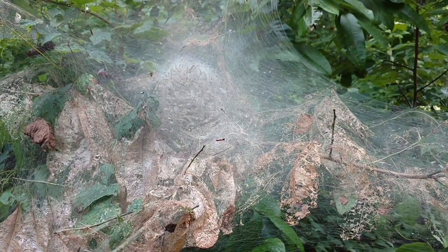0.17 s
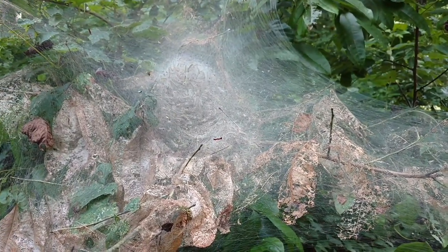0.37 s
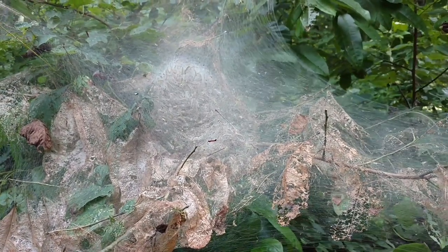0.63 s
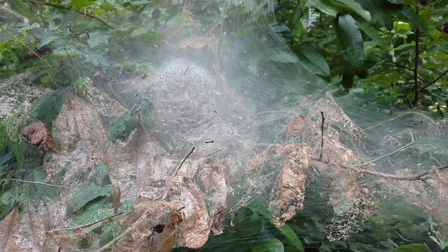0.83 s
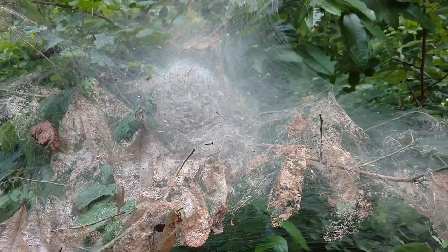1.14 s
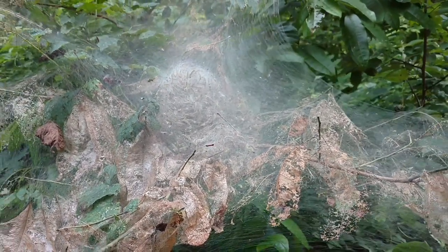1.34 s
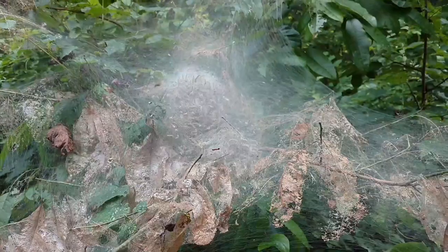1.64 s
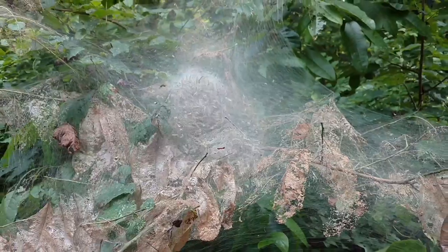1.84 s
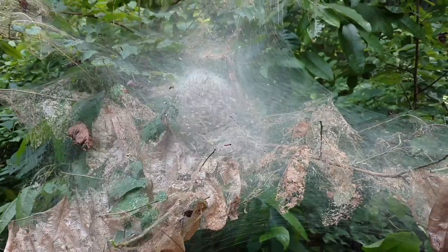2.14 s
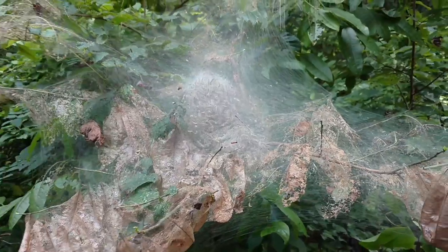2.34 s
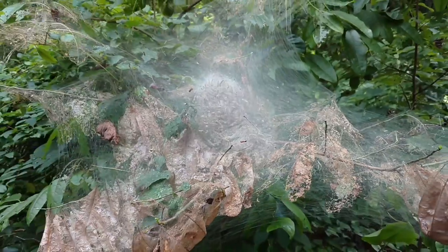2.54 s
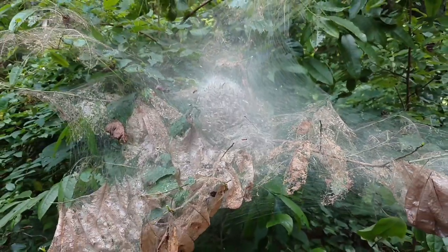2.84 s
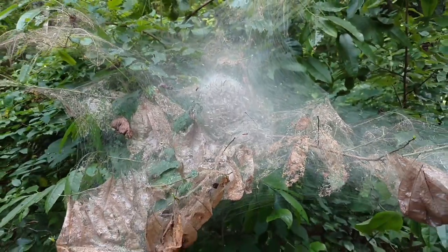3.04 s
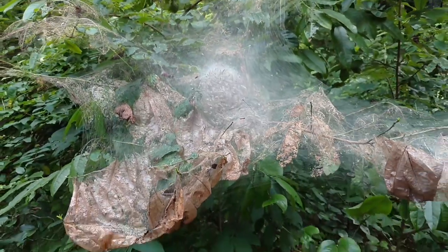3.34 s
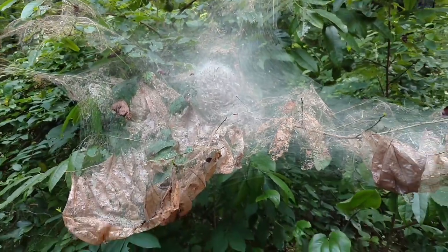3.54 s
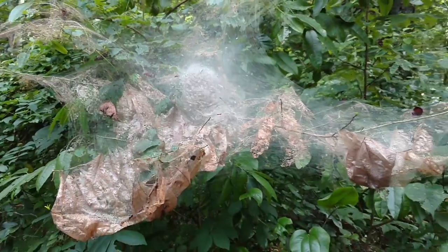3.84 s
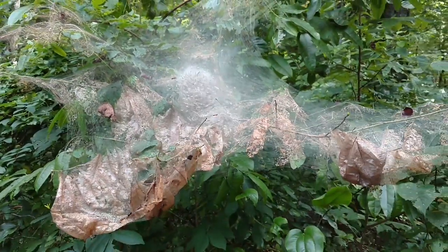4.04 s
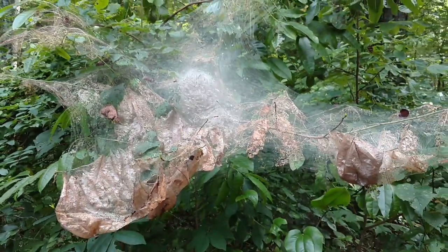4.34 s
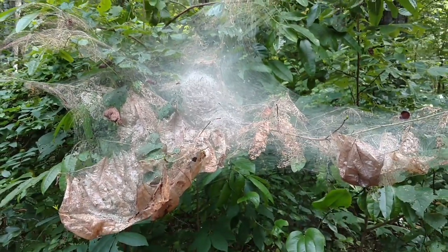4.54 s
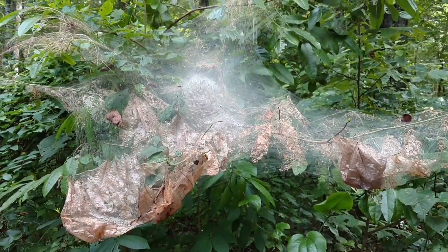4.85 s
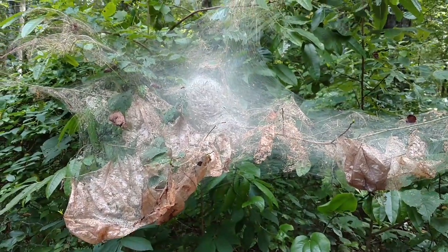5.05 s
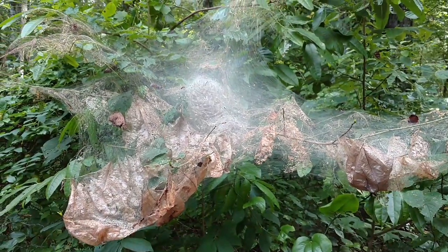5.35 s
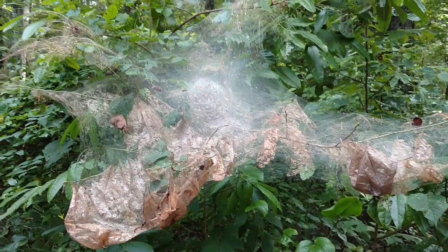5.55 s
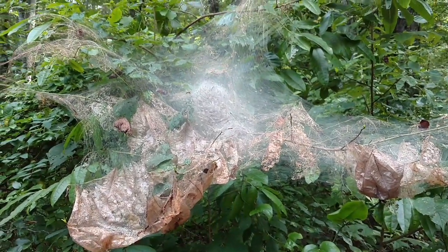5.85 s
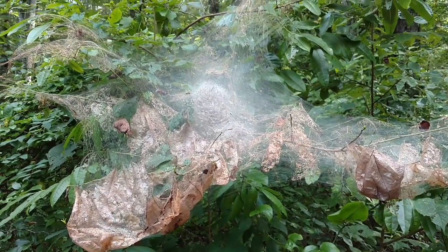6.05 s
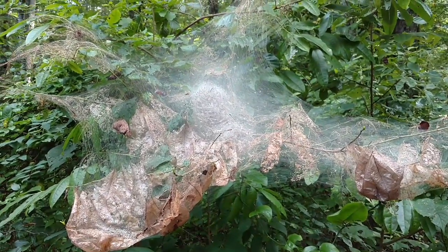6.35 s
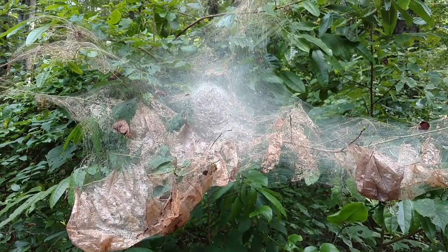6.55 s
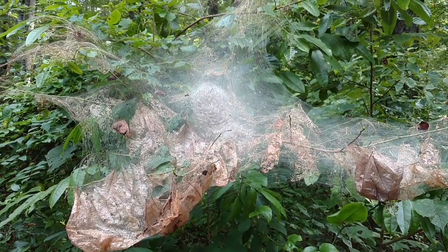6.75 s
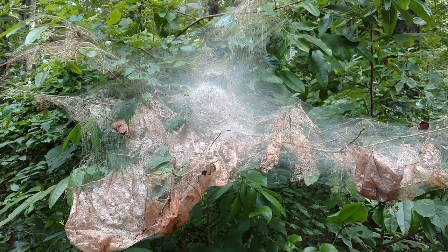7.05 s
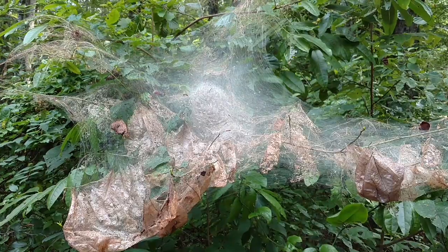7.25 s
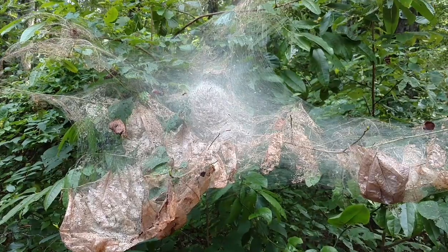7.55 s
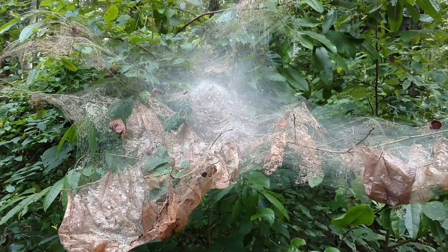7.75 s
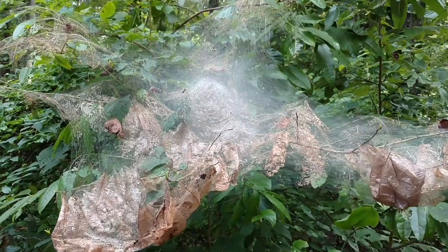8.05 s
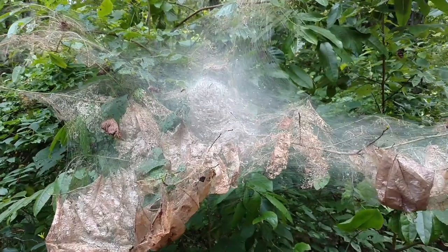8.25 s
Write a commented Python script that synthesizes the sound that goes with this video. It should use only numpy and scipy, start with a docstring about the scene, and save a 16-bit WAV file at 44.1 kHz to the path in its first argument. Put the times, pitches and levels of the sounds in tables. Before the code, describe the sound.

Shrill crickets fill the woodland air with a quick, quivering trill, short run-together chirps and a blurred far chorus. Beneath them a tangled wasp buzzes in ragged, fuzzy surges, weakening and recovering. Sparse dry snaps of twigs and leaves, the sharpest about two seconds in, break through gentle air hiss. The wide outdoor stereo is close and hand-held, with low tremor and two small grip knocks.

```python
"""A wasp caught in a web buzzes raggedly: five bands of noise at its wingbeat multiples, each driven by the struggle.
Summer crickets surround it: a near one strokes 21 tones a second, another trills short chirps, a far one sings
phrases of blurred tone, the rest are a chorus of resonated noise. Air and leaves hiss; twigs and dry leaves tick.
Two close hand-held capsules rumble and bump; the recorder widens them by delayed cross-subtraction."""
import sys
import numpy as np
from scipy import signal
from scipy.fft import rfft, irfft, next_fast_len
from scipy.io import wavfile

SR = 44100
rng = np.random.default_rng(int(sys.argv[2]) if len(sys.argv) > 2 else 0)


def store_pcm(level_fs):
    """Save levels as 16-bit WAV."""
    pcm = np.round(np.clip(level_fs, -1, 1) * 32767).astype(np.int16)
    wavfile.write(sys.argv[1], SR, np.atleast_2d(pcm).T)


N = 370440


def amp(db):
    """Decibels to gain."""
    return 10 ** (np.asarray(db) / 20)


def rms_one(x):
    """Scale to unit rms."""
    return x / np.sqrt(np.mean(x ** 2) + 1e-20)


def in_time(rows):
    """Interpolate each column after the first, sample by sample."""
    s, *columns = np.transpose(rows)
    return [np.interp(np.arange(N) / SR, s, column) for column in columns]


def at_hz(points, hz):
    """Read a spectrum on a log frequency axis."""
    points_hz, values = np.transpose(points)
    return np.interp(np.log(hz), np.log(points_hz), values)


def drift(rate_hz):
    """Slow random curve of unit rms: noise through two equal poles, computed every 40 samples."""
    step = 40
    r = np.exp(-2 * np.pi * rate_hz * step / SR)
    noise = rng.standard_normal(N // step + 2002)
    slow = signal.lfilter([1], [1, -2 * r, r * r], noise)[2000:]   # settled part
    return np.interp(np.arange(N) / step, np.arange(len(slow)), rms_one(slow))


def band_pass(x, low_hz, high_hz):
    """Second-order Butterworth band."""
    return signal.sosfilt(signal.butter(2, [low_hz, high_hz], "band", fs=SR, output="sos"), x)


def smear(noise, hz, width_hz):
    """A flat-topped band of noise around a pitch."""
    return band_pass(noise, hz - width_hz / 2, hz + width_hz / 2)


def resonate(x, hz, width_hz):
    """One two-pole resonance, gain about 1 at its top."""
    r = np.exp(-np.pi * width_hz / SR)
    zeros = np.array([1, 0, -1]) * (1 - r * r) / 2
    return signal.lfilter(zeros, [1, -2 * r * np.cos(2 * np.pi * hz / SR), r * r], x)


def pair(noise, alike):
    """Mix two unrelated noises into left and right of a given likeness."""
    alike = np.clip(alike, 0, 1)
    common = np.sqrt(1 + alike) * noise[0]
    opposed = np.sqrt(1 - alike) * noise[1] * np.array([[1], [-1]])
    return (common + opposed) / np.sqrt(2)


def pan_gain(pan_db):
    """Left and right gains for a level difference."""
    return amp([[pan_db / 2], [-pan_db / 2]])


def add(out, s, sound):
    """Mix a short sound in at a time."""
    i = max(round(s * SR), 0)
    out[..., i:i + sound.shape[-1]] += sound[..., :max(N - i, 0)]


def wing_note(length_s, hz, sag_hz, fall_hz, phase):
    """A file drawn over a scraper: complex tone under an arch, flatter at both ends and falling as it goes."""
    place = np.linspace(-1, 1, round(length_s * SR))
    pitch_hz = hz - fall_hz * place - sag_hz * place ** 2
    return (1 - place ** 2) ** 0.75 * np.exp(1j * (phase + 2 * np.pi * np.cumsum(pitch_hz) / SR))


def arrive(tone, hz, lead_us, pan_db, echo_db):
    """A narrow tone at both capsules (a left lead turns its phase), with short scatter from the leaves."""
    turn = np.exp(1j * np.pi * hz * lead_us * 1e-6)   # half the lead on each side
    direct = np.real([tone * turn * amp(pan_db / 2), tone / turn / amp(pan_db / 2)])
    age_s = np.arange(round(.08 * SR)) / SR
    leaves = rng.standard_normal((2, len(age_s))) * amp(-60 * age_s / 0.3) * (age_s > .002)
    leaves = leaves / np.linalg.norm(leaves[0])
    scatter = signal.oaconvolve(tone.real[None], leaves, axes=1)[:, :N]
    return direct + amp(echo_db) * scatter


# Wasp's struggle. Each row: time in seconds, wingbeat effort in dB, overtone effort in dB.
STRUGGLE = [(0.0, -52, -55), (0.65, -50, -52.5), (1.05, -49.5, -53.5), (1.33, -48.5, -54),
            (1.55, -53.5, -53), (1.87, -46, -52.5), (2.1, -47.5, -50), (2.57, -46.5, -57.5),
            (2.74, -43.5, -47), (2.95, -41.5, -42), (3.32, -47, -48), (3.55, -49.5, -51),
            (3.72, -43, -46.5), (3.9, -46, -46.5), (4.14, -45.5, -51.5), (4.6, -45, -51.5),
            (4.84, -46, -48), (5.25, -43.5, -49), (5.85, -45.5, -51), (6.1, -43.5, -49), (6.4, -43, -52),
            (6.62, -45, -52.5), (6.92, -46.5, -54.5), (7.13, -51.5, -58), (7.75, -52.5, -57),
            (8.09, -52, -53.5), (8.4, -46, -53)]
# Wingbeat multiples. Each row: center in Hz, smear width in Hz, level in dB added to its effort.
WINGBEAT_BANDS = [(128.1, 66.8, 7.5), (238.8, 82.3, 4), (364, 88, 2.5), (483, 88, -10), (588, 113, -20)]
SECOND_WAVER_DB, HIGHER_WAVER_DB = 0.43, 1.5   # rms
HIGHER_DB = -8.5   # multiples above the second
STRAIN_SHARE, CALM_DB = 0.65, -47   # above this overtone effort the top two grow faster


def wasp():
    """Tangled wings keep losing their rhythm, so each wingbeat multiple smears into a band of noise."""
    first_db, over_db = in_time(STRUGGLE)
    second_db = over_db + SECOND_WAVER_DB * drift(2.6)
    higher_db = over_db + HIGHER_DB + HIGHER_WAVER_DB * drift(3.8)
    top_db = higher_db + STRAIN_SHARE * np.maximum(over_db - CALM_DB, 0)
    efforts_db = [first_db, second_db, higher_db, top_db, top_db]
    push = rng.standard_normal((2, N))
    buzz = np.zeros((2, N))
    for effort_db, (hz, width_hz, db) in zip(efforts_db, WINGBEAT_BANDS):
        band = smear(smear(push, hz, width_hz), hz, width_hz)   # twice for steep sides
        buzz += amp(effort_db + db) * rms_one(band)
    left, right = amp(1.56 * drift(9.7)) * pair(buzz, alike=0.97)
    left = np.interp(np.arange(N) - 90e-6 * SR, np.arange(N), left)   # 90 us later on the left
    return np.array([left * amp(1.0), right])


# Air and leaves. Each row: frequency in Hz, power density in dB per Hz.
WOOD_SPECTRUM = [(40, -78.5), (75, -70.5), (200, -76.5), (400, -89), (700, -91), (1100, -93.5),
                 (1900, -97.5), (3000, -93), (4300, -100), (5700, -99), (8000, -107), (9500, -113),
                 (11500, -107), (14000, -110), (15500, -116)]
# Likeness of the two capsules. Each row: frequency in Hz, likeness from 0 to 1.
LIKENESS = [(60, 0.94), (130, 1), (400, 0.68), (700, 0.66), (1000, 0.6), (1800, 0.15), (15000, 0)]
# Leaves' hiss in the upper middle. Each row: time in seconds, level change in dB.
HISS = [(0, -1), (1.5, 0), (2.5, -0.4), (3.5, 0.6), (4.8, 1.4), (6.5, 1), (8.4, 2.5)]
HISS_FROM_HZ, HISS_TO_HZ = 1700, 6500


def wood():
    """Air and leaves: third-octave noise bands, each with its own level, likeness and flicker."""
    out = np.zeros((2, N))
    edges_hz = 30 * 2 ** (np.arange(29) / 3)
    white = rng.standard_normal((2, 2, N)) * np.sqrt(SR / 2)   # one unit of power per Hz
    hiss_db, = in_time(HISS)
    for k, (low_hz, high_hz) in enumerate(zip(edges_hz, edges_hz[1:])):
        band = band_pass(white[k % 2], low_hz, high_hz)   # neighbours use unrelated noise
        hz = np.sqrt(low_hz * high_hz)
        level_db = at_hz(WOOD_SPECTRUM, hz) + .5 * drift(6)
        if HISS_FROM_HZ < hz < HISS_TO_HZ:
            level_db = level_db + hiss_db
        out += amp(level_db) * pair(band, at_hz(LIKENESS, hz))
    return out


# Surges of the hand's tremor. Each row: middle in seconds, length in seconds, rise in dB.
SURGES = [(.55, .6, 4), (1.645, 0.13, 15), (1.95, 0.2, 12), (2.9, 0.46, 4), (3.273, 0.66, 15.5),
          (3.753, 0.79, 16.5), (5.6, .6, 9), (7.947, .3, 3)]
TREMOR_DB = -59.5   # rms between surges


def tremor():
    """The hand's tremor: lumpy low noise, opposite in the two capsules, surging now and then."""
    rumble = band_pass(rng.standard_normal(N), 40, 150)
    surge_db = np.zeros(N)
    for middle_s, length_s, rise_db in SURGES:
        add(surge_db, middle_s - length_s / 2, rise_db * np.hanning(round(length_s * SR)))
    return amp(TREMOR_DB + surge_db + 0.62 * drift(19)) * rms_one(rumble) * [[1], [-1]]


# Pitches of the blurred chorus. Each row: center in Hz, resonance width in Hz, power density in dB per Hz.
CHORUS_BANDS = [(6743, 280, -89.5), (6990, 320, -85.5), (7140, 270, -87.5), (7400, 170, -76),
                (7767, 160, -75), (7900, 150, -79), (8134, 235, -84.5)]
# Swell of the chorus. Each row: time in seconds, level change in dB.
CROWD_SWELL = [(0, -0.5), (1, -0.3), (2, -1), (2.8, -1), (3.6, 0), (4.6, 0), (5.6, 0), (6.6, -0.2),
               (7.5, -0.5), (8.4, .6)]


def chorus():
    """Far crickets too many to tell apart: resonated noise bands, each wavering fast and slowly."""
    white = rng.standard_normal((2, N)) * np.sqrt(SR / 2)   # one unit of power per Hz
    swell_db, = in_time(CROWD_SWELL)
    crowd = np.zeros((2, N))
    for hz, width_hz, db in CHORUS_BANDS:
        waver_db = 2.0 * drift(31) + 0.71 * drift(4.6)
        crowd += amp(db + swell_db + waver_db) * resonate(resonate(white, hz, width_hz), hz, width_hz)
    return crowd


# Chirps of the triller. Each row: start in seconds, level in dB before stroke force; the last only ends the one before.
CHIRPS = [(.008, -48), (.114, -49), (0.238, -47.5), (0.372, -47.5), (.536, -46), (.673, -46), (0.783, -49),
          (.928, -50), (1.06, -49), (1.176, -49), (1.306, -50), (1.445, -44), (1.571, -46.5), (1.688, -48),
          (1.833, -51.5), (1.982, -52.5), (2.113, -55), (2.268, -54), (2.41, -55), (2.551, -52),
          (2.67, -53.5), (2.824, -51.5), (3.069, -47.5), (3.205, -48.5), (3.333, -48.5), (3.48, -48.5),
          (3.621, -51.5), (3.744, -49), (3.876, -50), (3.993, -52), (4.121, -50), (4.247, -51),
          (4.389, -50), (4.513, -49), (4.662, -50), (4.789, -52), (4.921, -52), (5.066, -50.5),
          (5.272, -51), (5.398, -50.5), (5.544, -51.5), (5.705, -50.5), (5.859, -51), (5.978, -53.5),
          (6.107, -52.5), (6.236, -53), (6.361, -52), (6.473, -52), (6.605, -51), (6.729, -50),
          (6.834, -51), (6.978, -49), (7.109, -48), (7.236, -46), (7.355, -48.5), (7.484, -51.5),
          (7.632, -51), (7.776, -52), (7.922, -49), (8.074, -46), (8.222, -45.5), (8.375, -45.5),
          (8.5, -42)]
# Its voice. Each row: time in seconds, pitch in Hz, lower tone in dB against the main tone.
TRILL_VOICE = [(0, 7390, -9), (.8, 7344, -17), (1.5, 7400, -11.5), (2, 7245, -7.5), (2.4, 7120, -6),
               (2.8, 7280, -12), (3.25, 7220, -11.5), (3.6, 7290, -2.5), (4, 7230, -5.5), (4.4, 7210, -4),
               (5.5, 7290, 0.5), (6.5, 7235, -0.5), (7.2, 7290, -3.5), (7.7, 7200, -5), (8.4, 7410, -2)]
# Aim of the capsules by hand. Each row: time in seconds, near cricket's left lead in us, its L-R in dB,
# triller's left lead in us, its L-R in dB.
AIM = [(0.0, 14, 1, 66, 5), (0.6, 28, -0.5, 46, -2), (0.9, 38, 0, 59, 1), (1.5, 49, -6, 65, -2),
       (2.0, 50, 7, 52, -15.5), (2.4, 54, -5, 26, 1), (2.85, 27, -6.5, 19, -16.5), (3.5, 43.4, -2.5, 40, 4),
       (3.9, 50, -5, 67, 3), (4.2, 55, -2.5, 58, 6), (4.8, 46, -2, 49, 3), (6.0, 47.6, -4, 45, 10),
       (7.0, 48.4, -7, 58, 8.5), (7.8, 52, -0.5, 62, -15.5), (8.4, 39, -6, 38, 8)]
TRILL_HZ = 7250   # for arrival phase
CHIRP_PAUSE_S = .036   # last stroke to next chirp
LOWER_SPREAD_HZ = 96   # full range, stroke to stroke
LOWER_LEAD_US, LOWER_PAN_DB = -18, -7   # lower tone's own lead and L-R, added to the main tone's


def triller():
    """Each chirp is a run of strokes about 20 ms apart; a lower tone trails each stroke."""
    notes, lower = np.zeros((2, N), complex)
    voice_hz, lower_db = in_time(TRILL_VOICE)
    chances = rng.random((len(CHIRPS), 4, 16))
    for (s, db), (next_s, _), chance in zip(CHIRPS, CHIRPS[1:], chances):
        length_s, now = next_s - s - CHIRP_PAUSE_S, int(s * SR)
        hz, low_gain = voice_hz[now], amp(lower_db[now])
        stroke_times_s = np.linspace(s, s + length_s, round(length_s / .0195) + 1)
        for at_s, (turn, low_turn, force, slip) in zip(stroke_times_s, chance.T):
            level = amp(db + 6.0 - 3.4 * force)
            note_hz = hz + 120 * (low_turn - .5)
            low_hz = hz - 260 + LOWER_SPREAD_HZ * (slip - .5)
            note = wing_note(0.01123, note_hz, sag_hz=202, fall_hz=170, phase=2 * np.pi * turn)
            low_note = wing_note(0.0094, low_hz, sag_hz=99, fall_hz=50, phase=2 * np.pi * low_turn)
            add(notes, at_s - .0065, level * note)
            add(lower, at_s - .004, level * low_gain * low_note)
    lead_us, pan_db = in_time(AIM)[2:]
    main = arrive(notes, TRILL_HZ, lead_us, pan_db, echo_db=-6.5)
    return main + arrive(lower, TRILL_HZ, lead_us + LOWER_LEAD_US, pan_db + LOWER_PAN_DB, echo_db=-2.5)


# Phrases of the far cricket. Each row: start in seconds, length in seconds, rms at full swell in dB.
PHRASES = [(.15, 0.46, -70), (1.1, 0.49, -84), (2.1, 0.56, -81), (3.2, 0.4, -75), (4.1, 0.4, -68),
           (5.1, 0.44, -63), (6.092, 0.44, -64), (6.947, 0.52, -67), (7.75, 0.28, -71)]
PHRASE_HZ = 6450


def far_cricket():
    """One far singer: a tone blurred into narrow noise, in phrases that swell and fade."""
    swell = np.zeros(N)
    for s, length_s, db in PHRASES:
        add(swell, s, amp(db) * signal.windows.tukey(round(length_s * SR), .5))
    blurred = resonate(resonate(rng.standard_normal((2, N)), PHRASE_HZ, 200), PHRASE_HZ, 200)
    return swell * rms_one(blurred)


# Ticks in the highest treble. Each row: time in seconds, level in dB before BRIGHT_GAIN_DB.
BRIGHT_TICKS = [(0.638, -55), (0.7811, -58), (0.8754, -63), (1.4461, -65), (1.493, -67), (1.6836, -62),
                (1.9654, -59), (2.0742, -57), (2.822, -66), (3.0131, -57), (3.5848, -64), (4.0622, -60),
                (4.4413, -61), (5.3936, -58), (5.8731, -64), (6.2073, -57), (6.2547, -56), (6.5879, -68),
                (7.1546, -62)]
BRIGHT_S, BRIGHT_GAIN_DB = 0.0013, 4


def bright_ticks():
    """Very short, arched bursts of very high noise."""
    out, shape = np.zeros((2, N)), np.hanning(round(BRIGHT_S * SR))
    grits = rng.standard_normal((len(BRIGHT_TICKS), 2, len(shape)))
    for (s, db), grit in zip(BRIGHT_TICKS, grits):
        burst = rms_one(band_pass(pair(grit, 0.2), 9200, 15800))
        add(out, s - .001, amp(db + BRIGHT_GAIN_DB) * shape * burst)
    return out


# Near cricket's song. Each row: time in seconds, lag behind the steady beat in ms, note level in dB, pitch in Hz.
SONG = [(.74, 3, -41, 7700), (1.2, 1.5, -39.5, 7790), (1.8, 4, -38.5, 7900), (2.1, -4, -38, 7730),
        (2.4, -4, -34.5, 7900), (2.85, -3.5, -32, 7880), (3.4, -3, -34.5, 7956), (3.9, -1.5, -35, 7900),
        (4.15, -2, -33, 7970), (4.7, -1, -34, 7900), (5.05, 1, -34, 7920), (5.35, -1.5, -33.5, 7940),
        (5.7, -1.5, -33, 7960), (6.2, 3.5, -34, 7944), (6.75, 1.5, -35, 7880), (7.05, -1, -35.5, 7910),
        (7.75, -2.1, -33.5, 8000), (8.4, 4, -34, 7940)]
# Grip of the scraper. Each row: time in seconds, tick level in dB over SCRAPE_DB.
GRIP = [(0, 1), (1.2, 1), (1.5, 0), (2.5, 0), (3.0, -5), (3.35, 1), (3.7, 5.5), (4.2, 3), (4.9, 1),
        (5.2, -2), (6.1, -1), (6.5, -0.5), (7.1, 1), (7.6, 0), (8.4, -7)]
# Strokes on which the scraper catches hard. Each row: time in seconds, approximate scrape peak in dB.
CATCHES = [(.8355, -55), (.9772, -52), (3.4027, -55), (3.544, -49), (4.0696, -53), (4.4496, -50),
           (4.88, -50), (5.3544, -53), (5.4007, -47), (6.2154, -53), (6.268, -40), (6.6911, -56),
           (7.068, -56)]
FIRST_STROKE_S, STROKE_S = .7404, .047585
STROKE_SPREAD_MS, STROKE_SPREAD_HZ, SCRAPE_SPREAD_DB = 0.92, 20.5, 2   # standard deviation, stroke to stroke
SCRAPE_DB, SCRAPE_S = -60, .006
NEAR_HZ = 7900   # for arrival phase


def near_cricket():
    """A clear note per wing stroke on a nearly steady beat; the scraper catches with a thin tick."""
    notes, scrape = np.zeros(N, complex), np.zeros(N)
    beat_s = np.arange(FIRST_STROKE_S, N / SR, STROKE_S)
    now = (beat_s * SR).astype(int)
    late_ms, song_db, song_hz = (column[now] for column in in_time(SONG))
    luck = rng.standard_normal((3, len(beat_s)))
    times_s = beat_s + (late_ms + STROKE_SPREAD_MS * luck[0]) / 1000
    notes_hz = song_hz + STROKE_SPREAD_HZ * luck[1]
    scrape_db = SCRAPE_DB + in_time(GRIP)[0][now] + SCRAPE_SPREAD_DB * luck[2]
    for s, db in CATCHES:
        scrape_db[np.argmin(np.abs(times_s - s))] = db
    chances = rng.random((len(beat_s), 2))
    for s, db, hz, tick_db, (turn, delay) in zip(times_s, song_db, notes_hz, scrape_db, chances):
        note = wing_note(0.016, hz + 50, sag_hz=340, fall_hz=70, phase=2 * np.pi * turn)
        add(notes, s - .0082, amp(db) * note)
        add(scrape, s - .011 + 0.008 * delay, amp(tick_db) * np.hanning(round(SCRAPE_S * SR)))
    lead_us, pan_db = in_time(AIM)[:2]
    grit = rms_one(smear(pair(rng.standard_normal((2, N)), 0.07), 11820, 1300))
    ticks = scrape * grit / 2   # noise peaks near twice its rms
    return arrive(notes, NEAR_HZ, lead_us, pan_db, echo_db=-12.0) + ticks


# Twigs and leaves. Each row: start in seconds, ring level in dB, starting ring pitch in Hz, ring t60 in seconds,
# L-R in dB, snap level in dB, snap pitch in Hz.
TWIG_TICKS = [(1.0757, -57, 940, 0.016, 3, -49.5, 3030), (1.0765, -47, 2500, .008, 0, -61, 1500),
              (1.388, -36, 1520, 0.0086, 10, -69, 1500), (1.729, -57, 1680, 0.016, 0, -55, 1600),
              (2.1786, -49, 2600, 0.0073, -8, -58, 2600), (2.1799, -44, 2230, 0.01, 14, -46, 3300),
              (2.1804, -33, 2780, .015, -8, -45, 2600), (2.1812, -42.5, 1160, 0.0042, -7, -46, 7900),
              (2.1848, -41, 2940, 0.013, -13, -45.5, 3280), (3.8407, -64, 700, .008, -5, -51, 2200),
              (4.312, -38.5, 985, 0.028, -7, -52, 1000), (4.311, -42, 1320, 0.033, 4, -72, 1150),
              (5.664, -55, 1140, 0.021, 0, -65, 1200), (6.0542, -57, 890, 0.011, 5, -47.5, 1100),
              (6.071, -65, 1500, 0.018, 3, -50, 1300), (7.22, -62, 1320, 0.022, 0, -52, 1500)]
RING_FALL = 0.45   # decay rate of the ring's phase multiplier per t60
CLICK_DB = 19   # first break of a snap, over its grit
SNAP_LOW, SNAP_HIGH = 4, 1.5   # band from a quarter of snap pitch to half above it
TAIL_DB, TAIL_T60_S = -12, .09   # leaves scatter each snap


def twigs():
    """Twigs and dry leaves tick: a brief ring of falling pitch over a dry snap of click and grit."""
    out = np.zeros((2, N))
    age_s = np.arange(round(.1 * SR)) / SR
    click = amp(CLICK_DB) * (np.arange(len(age_s)) == round(.0006 * SR))
    snap_decay = amp(-60 * age_s / 0.012) + amp(TAIL_DB - 60 * age_s / TAIL_T60_S)
    onset = np.minimum(age_s / 0.00011, 1)   # the fibres give way over a moment
    grits = rng.standard_normal((len(TWIG_TICKS), 2, len(age_s)))
    for (s, db, hz, t60_s, pan_db, snap_db, snap_hz), grit in zip(TWIG_TICKS, grits):
        cycles = hz * age_s * np.exp(-RING_FALL * age_s / t60_s)
        ring = amp(db - 60 * age_s / t60_s) * np.sin(2 * np.pi * cycles)
        crack = band_pass(pair(grit, 0.35) + click, snap_hz / SNAP_LOW, snap_hz * SNAP_HIGH)
        snap = amp(snap_db) * snap_decay * onset * rms_one(crack)
        add(out, s, (ring + snap) * pan_gain(pan_db))
    return out


# Grip shifts. Each row: start in seconds, level in dB before rise and decay, pitch in Hz, t60 in seconds, L-R in dB.
BUMPS = [(3.792, -34, 307, 0.015, 27), (3.8399, -12.5, 203, 0.0038, 31), (7.851, -31.5, 332, 0.013, -21),
         (7.853, -29.5, 123, 0.15, -21), (7.881, -18.5, 137, 0.024, -24.5)]


def bumps():
    """The grip shifts and rocks the capsules against each other: low decaying sines of opposite sign."""
    out = np.zeros((2, N))
    age_s = np.arange(round(.1 * SR)) / SR
    for s, db, hz, t60_s, pan_db in BUMPS:
        rise = np.minimum(age_s * hz * 2.03, 1)   # about half a cycle
        push = amp(db - 60 * age_s / t60_s) * rise * np.sin(2 * np.pi * hz * age_s)
        add(out, s, push * pan_gain(pan_db) * [[1], [-1]])
    return out


def scene():
    """Everything as it reaches the two capsules."""
    background = wood() + tremor() + chorus() + far_cricket()
    singers = wasp() + triller() + near_cricket()
    return background + singers + bright_ticks() + twigs() + bumps()


WIDEN_SHARE, WIDEN_S = .71, 17.18 / SR
CUTOFF_HZ = 15700


def record(dry):
    """Each side loses a delayed share of the other; the bass rolls off, the top is cut."""
    size = next_fast_len(N + 64)
    late = WIDEN_SHARE * np.exp(-2j * np.pi * np.fft.rfftfreq(size, 1 / SR) * WIDEN_S)
    wide = dry - irfft(rfft(dry[::-1], size) * late, size)[:, :N]
    wide = signal.sosfilt(signal.butter(2, 60, "high", fs=SR, output="sos"), wide)
    return signal.sosfilt(signal.ellip(12, .5, 70, CUTOFF_HZ, fs=SR, output="sos"), wide)


dry = scene()
out = record(dry)
store_pcm(out)
```